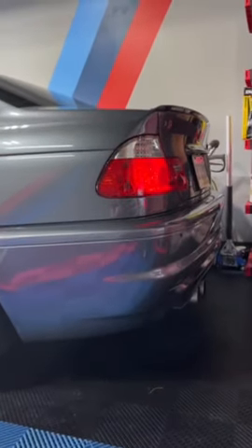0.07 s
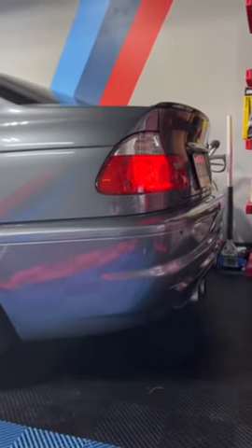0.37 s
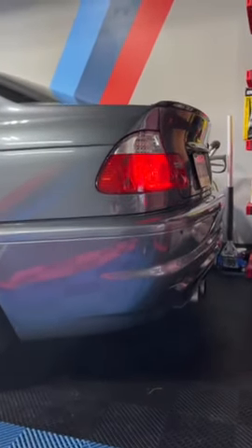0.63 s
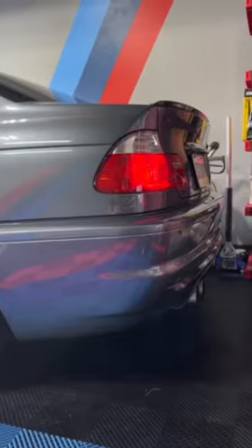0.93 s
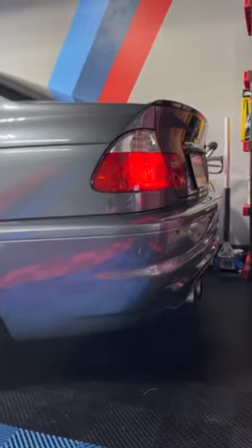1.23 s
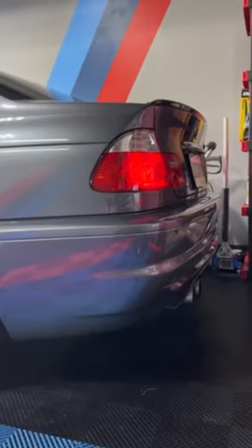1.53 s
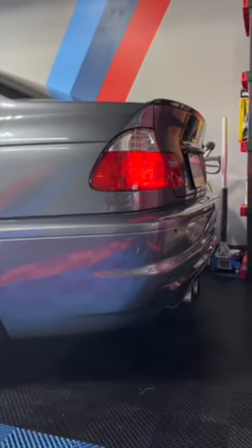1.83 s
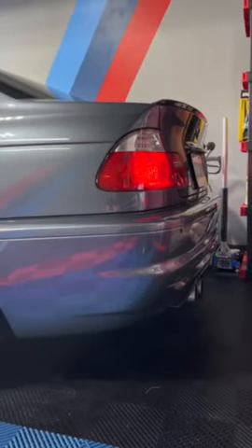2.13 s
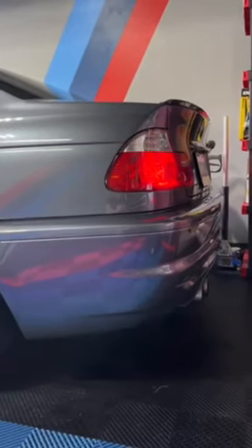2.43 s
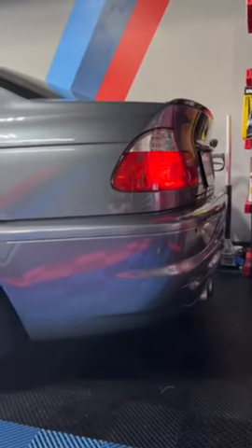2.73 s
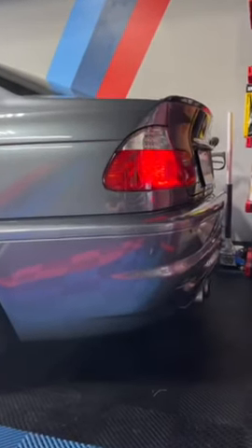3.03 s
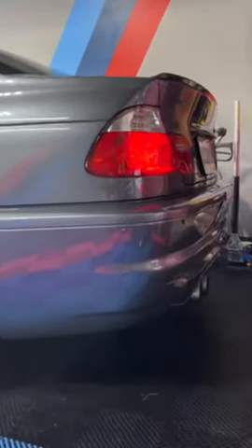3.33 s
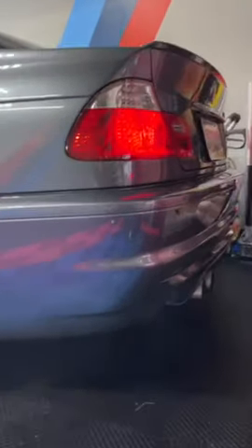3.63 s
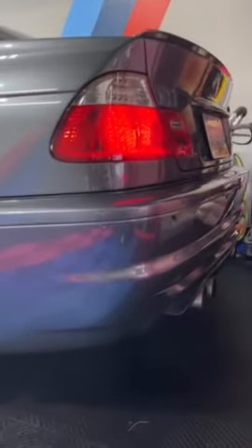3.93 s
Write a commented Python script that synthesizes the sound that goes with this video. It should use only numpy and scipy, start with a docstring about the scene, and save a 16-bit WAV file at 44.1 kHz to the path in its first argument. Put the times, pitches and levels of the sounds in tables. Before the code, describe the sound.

A parked car idles in an enclosed garage, heard close to the tailpipes. The engine speed sinks and the exhaust deepens into a booming, slightly uneven drone with soft burbles and faint hiss, rasping more as the microphone moves closer.

```python
"""The throb of a six-cylinder car at fast idle, in a closed garage, two microphones beside the tailpipes.
The engine settles to idle; as the firing rate sinks under 65 Hz it meets a resonance of exhaust and
room and swells into a deep boom. The two cylinder banks throb at half that rate, gas puffs out at each
firing, uneven firings burble, and behind it all the engine whirs and hisses.
Near the end the microphones move closer to the pipes and the rasp grows."""
import sys
import numpy as np
from scipy import signal
from scipy.fft import rfft, irfft
from scipy.io import wavfile
from scipy.ndimage import uniform_filter1d, minimum_filter1d

SR = 44100
rng = np.random.default_rng(int(sys.argv[2]) if len(sys.argv) > 2 else 0)


def output_pcm(signal):
    """Save a mono or channel-first signal as 16-bit PCM at the path in sys.argv[1].

    Samples are clipped to [-1, 1] before scaling.
    """
    pcm = np.clip(np.atleast_2d(signal).T, -1, 1) * 32767
    wavfile.write(sys.argv[1], SR, np.round(pcm).astype(np.int16))


N = 176400
T = np.arange(N) / SR
HZ = np.fft.rfftfreq(N, 1 / SR)


def amp(db):
    """Decibels to gain."""
    return 10 ** (np.asarray(db) / 20)


def unit(x):
    """Scales to rms 1."""
    return x / np.sqrt(np.mean(abs(x) ** 2) + 1e-20)


def curve(table, column=1):
    """One column of a time table, at every sample."""
    columns = np.transpose(table)
    return np.interp(T, columns[0], columns[column])


def colour(points, hz=HZ):
    """Gain of a spectrum at the given frequencies."""
    f, db = np.transpose(points)
    return amp(np.interp(np.log(hz + 1), np.log(f + 1), db))


def resonances(modes):
    """Gain of a set of narrow resonances at every frequency."""
    return np.sqrt(sum(amp(db) ** 2 / (1 + ((HZ - hz) / width) ** 2) ** 2 for hz, width, db in modes))


def wander(rate_hz=3, size=800):
    """Slow complex random flutter, rms about 1."""
    f = np.fft.fftfreq(size, N / SR / size)
    spectrum = rng.standard_normal(size) + 1j * rng.standard_normal(size)
    drift = np.fft.ifft(spectrum / (1 + (f / rate_hz) ** 2))
    return np.interp(T, np.linspace(0, T[-1], size), unit(drift))


# The microphone pair: f/Hz, left-right likeness, lead of the left/rad
MIC_PAIR = [(0, 1, 0), (200, .99, 0), (420, .95, -.1), (720, .76, -.25), (1300, .72, -.1), (1900, .93, 0),
            (2250, .85, .2), (2900, .35, 1.4), (3800, .56, .9), (4400, .5, 1.8), (4900, .66, 3.3),
            (5400, .68, 5.3), (6000, .9, 6.3), (7300, .73, 7.8), (9000, .97, 9.4), (10200, .87, 10.3),
            (11600, .88, 11.7), (12200, .98, 12.55)]

def noise(gain):
    """Coloured noise of rms 1 as the two microphones hear it in the garage."""
    direct, diffuse = rfft(rng.standard_normal((2, N)))
    f, alike, lead = np.transpose(MIC_PAIR)
    alike, lead = np.interp(HZ, f, alike), np.interp(HZ, f, lead)
    right = alike * direct * np.exp(-1j * lead) + np.sqrt(1 - alike ** 2) * diffuse
    return unit(irfft(np.array([direct, right]) * gain, N))


# Bass modes of the garage: f/Hz, width/Hz, relative level/dB
ROOM_MODES = [(53, 8.8, -2), (98.8, 3, -0.5), (133, 9.3, -4)]
# Their rumble: t/s, level/dB
ROOM_LEVEL = [(0, -30), (.2, -23.5), (.4, -32), (1, -25), (1.5, -53), (2, -26), (2.8, -56), (4, -56)]

def garage():
    """All around the microphones, the gas flow stirs the narrow bass resonances of the room."""
    return noise(resonances(ROOM_MODES)) * amp(curve(ROOM_LEVEL))


# Spectra of belts and valve gear, and of air: f/Hz, relative level/dB
WHIR_SPECTRUM = [(300, -84), (800, 7), (1080, 6.5), (1350, 4), (1650, 1.5), (1850, 1), (2070, 0.5),
                 (2300, 0.5), (2650, 1), (3100, -3.5), (3700, -10), (4400, -6), (5200, -52), (12000, -59)]
HISS_SPECTRUM = [(1500, -61), (2700, -8.5), (3600, -1), (4500, -1.5), (5000, -3), (5900, -2), (6600, -0.5),
                 (7500, 0), (8600, -5), (9700, -0.5), (11100, 5), (12000, -6.5), (13000, -12), (13700, -29),
                 (16000, -32)]
# Whines of the belt drive: f/Hz, width/Hz, relative level/dB
BELT_WHINES = [(1658, 30, 1.5), (2044, 42, 0), (3570, 30, -3)]
# The engine as heard from the tailpipes: t/s, whir level/dB, hiss level/dB
ENGINE_LEVELS = [(0, -33.5, -37.5), (.35, -34, -37.5), (.7, -36.5, -38.5), (1.1, -39, -37),
                 (1.45, -40.5, -36.5), (1.8, -39, -34.5), (2.02, -40, -38.5), (2.4, -40.5, -36.5),
                 (2.8, -36.5, -34), (3.2, -37, -32.5), (3.6, -36.5, -33), (4, -35.5, -31.5)]

def engine(firings):
    """Farther off, a whir that pulses lightly with the valves, faint belt whines and a hiss of air."""
    whir = noise(colour(WHIR_SPECTRUM)) * (1 + .11 * np.cos(2 * np.pi * firings))
    whine = noise(resonances(BELT_WHINES)) * amp(-12)
    hiss = noise(colour(HISS_SPECTRUM)) * (1 + .11 * wander(rate_hz=12).real)
    return (whir + whine) * amp(curve(ENGINE_LEVELS, 1)) + hiss * amp(curve(ENGINE_LEVELS, 2))


# Resonances of the tailpipes and of their mouth: f/Hz, width/Hz, relative level/dB
PIPE_MODES = [(244.5, 17, 2), (326, 20, 2.5), (369, 10.7, 5), (431, 19, -0.5), (667, 12, -2.5),
              (728, 16, -2.5), (892, 9.7, -3.5), (1068, 20, -19)]
MOUTH_MODES = [(559.6, 13, 0)]
# The ringing of each at the microphones: t/s, level/dB
PIPE_LEVEL = [(0, -57), (.6, -36.5), (.8, -30.5), (1.1, -34.5), (1.35, -30.5), (1.55, -31), (1.75, -27.5),
              (2, -33), (2.4, -29), (2.8, -34), (3.3, -30), (3.6, -33), (4, -31)]
MOUTH_LEVEL = [(0, -53), (1.2, -43), (1.55, -46), (2, -48), (2.8, -45), (3.55, -33), (4, -29)]

def pipe_ring():
    """Gas rings the tailpipes; the note at their mouth grows as the microphones come close."""
    pipes = noise(resonances(PIPE_MODES)) * amp(curve(PIPE_LEVEL))
    mouth = noise(resonances(MOUTH_MODES)) * amp(curve(MOUTH_LEVEL))
    return pipes + mouth


# Burbles in the pipes: crest t/s, f/Hz, level/dB, swell time/s
BURBLES = [(.6, 311, -31, .06), (.775, 250, -25, .05), (.79, 360, -22, .08), (1.095, 250, -19.5, .045),
           (1.095, 320, -26, .04), (1.17, 308, -26, .035), (1.59, 660, -34, .04), (1.86, 250, -26, .04),
           (1.98, 670, -32, .06), (2.17, 246, -22.5, .04), (2.24, 250, -25, .03), (3.52, 256, -22.5, .05),
           (3.555, 590, -21, .018), (3.59, 385, -25, .025), (3.869, 590, -18.5, .008)]

def burbles():
    """An uneven firing thumps one pipe resonance, which swells and dies away."""
    out = np.zeros(N)
    for (crest, hz, db, swell), phase in zip(BURBLES, rng.random(len(BURBLES))):
        age = np.maximum(1 + (T - crest) / swell, 0)
        envelope = (age * np.exp(1 - age)) ** 4
        out += amp(db) * envelope * np.cos(2 * np.pi * (hz * T + phase))
    return np.sqrt(2) * out


# Spectrum of the rushing gas: f/Hz, relative level/dB
GAS_SPECTRUM = [(50, -30), (130, -6), (190, -2), (250, 1), (360, 0), (440, -.5), (620, -8), (800, -13),
                (1050, -13.5), (1500, -22.5), (3000, -33), (8000, -63)]
# The gas beside the pipes: t/s, level/dB
GAS_LEVEL = [(0, -38), (.6, -37.5), (.8, -34), (1.1, -32.5), (1.4, -35), (1.75, -34), (2.15, -32),
             (2.7, -34), (3.1, -32), (3.35, -30), (3.57, -28), (4, -30)]
# The six cylinders in firing order: relative level/dB
CYLINDERS = [1.5, -0.77, 1.8, -2.2, 1.3, -1.2]
FIRING_NUMBERS = np.arange(400)

def gas_puffs(pulses):
    """Gas leaves the pipes in a puff at each firing, each cylinder with its own strength."""
    cylinder = amp(np.interp(pulses, FIRING_NUMBERS, np.resize(CYLINDERS, len(FIRING_NUMBERS))))
    puffing = unit(cylinder * (1 + .7 * np.cos(2 * np.pi * pulses)))
    return noise(colour(GAS_SPECTRUM)) * puffing * amp(curve(GAS_LEVEL))


def bank_pulses(rate, pulses, response, rough, spread, smear_s_per_hz):
    """Pulses of the cylinder banks as fluttering harmonics, smeared in time by pipe and room."""
    mid, side = np.zeros((2, N))
    bank_phasor = np.exp(1j * np.pi * pulses)
    low, high = response[0][0], response[-1][0]
    rough = rough * (rate.min() / rate) ** .6  # a faster engine flutters less
    for k in np.setdiff1d(np.arange(1, 42), [2, 4, 6]):  # boom() plays these three
        hz = k * rate / 2
        if hz.max() > low and hz.min() < high:
            smear = np.exp(-1j * np.pi * smear_s_per_hz * (hz.mean() - low) ** 2)
            harmonic = colour(response, hz) * bank_phasor ** k * smear
            mid += (harmonic * (1 + rough * wander())).real
            side += (harmonic * wander()).real * spread * min(k / 10, 1) ** 2
    return np.array([mid + side, mid - side]) * np.sqrt(2 / (1 + rough ** 2))


# Response of pipe and garage to the banks, in a low, a middle and a high band: f/Hz, level/dB
THROB_BAND = [(26, -50), (34, -31), (44, -37), (84, -28.5), (94, -24.5), (125, -30.5), (141, -21),
              (156, -24.5), (176, -25.5), (198, -36), (216, -26.5), (234, -31), (254, -30), (275, -38),
              (310, -101)]
HOLLOW_BAND = [(255, -54), (284, -35), (296, -36), (312, -27.5), (330, -34.5), (345, -37), (366, -31),
               (390, -33.5), (410, -45.5), (430, -54.5), (465, -40.5), (520, -47), (600, -54)]
RASP_BAND = [(400, -52), (470, -42), (530, -50), (580, -37), (620, -44), (650, -41), (700, -48), (735, -47),
             (810, -58), (885, -50), (1000, -55), (1400, -90)]
# Gain on each band: t/s, throb level/dB, hollow level/dB, rasp level/dB
BAND_LEVELS = [(0, -3, -5, 2), (.4, 0, -0.5, -8.5), (.6, 1, -5, -8), (.8, -3, 0, -10), (1.1, -5.5, -4, -13),
               (1.35, -4, -7.5, -9.5), (1.55, -1.5, -6, 0.5), (1.75, -5.5, -5.5, -17),
               (1.95, -5.5, -5.5, -2), (2.15, -8, -8, -11.5), (2.45, -2, -6, -3), (2.62, -2.5, 1.5, -4.5),
               (3.15, -3.5, 1.5, -1), (3.35, -3.5, -4, 1), (3.57, -1, -0.5, 0), (3.78, -1, 3, -1),
               (4, -2, 1.5, 1)]

def exhaust(rate, firings):
    """Close by, the pipes throb, sound hollow, rasp and puff; no two firings are quite alike."""
    pulses = firings - 1.22  # the pulses trail the boom
    uneven = np.interp(pulses, FIRING_NUMBERS, 1 + .09 * rng.standard_normal(len(FIRING_NUMBERS)))
    puffs = gas_puffs(pulses)
    ring = pipe_ring()
    throb = bank_pulses(rate, pulses, THROB_BAND, rough=.18, spread=.0075, smear_s_per_hz=7e-5)
    hollow = bank_pulses(rate, pulses, HOLLOW_BAND, rough=.27, spread=.15, smear_s_per_hz=7e-5)
    rasp = bank_pulses(rate, pulses, RASP_BAND, rough=.6, spread=.37, smear_s_per_hz=5e-5)
    throb *= amp(curve(BAND_LEVELS, 1))
    hollow *= amp(curve(BAND_LEVELS, 2))
    rasp *= amp(curve(BAND_LEVELS, 3))
    return throb + uneven * (hollow + rasp + puffs) + ring


# Tones at one, two and three times the firing rate: t/s, level/dB
BOOM_LEVEL = [(0, -16), (.3, -15.5), (.5, -20), (.8, -23.5), (.95, -21), (1.1, -10.5), (1.3, -7.5),
              (1.55, -6), (1.68, -7), (1.8, -11), (2.02, -10.5), (2.2, -8.5), (2.65, -4.5), (3.25, -5),
              (3.52, -4), (3.75, -3.5), (4, -3)]
DRONE_LEVEL = [(0, -26), (.2, -29), (.38, -25.5), (.52, -31), (.65, -28), (.73, -20), (.8, -16),
               (.88, -15.3), (.97, -18.5), (1.1, -28), (1.5, -35), (1.85, -25.5), (2.2, -29), (2.6, -37),
               (3.2, -38), (3.5, -31), (3.8, -37), (4, -34)]
OVERTONE_LEVEL = [(0, -28), (.4, -26.5), (.5, -36.5), (1.1, -35.5), (1.3, -29), (1.8, -31.5), (2, -29.5),
                  (2.45, -32), (2.75, -36.5), (3.5, -30), (4, -29)]

def boom(firings):
    """The firing tone and two wavering overtones fill the garage, swelling where they meet resonances."""
    angle = 2 * np.pi * firings
    fundamental = amp(curve(BOOM_LEVEL)) * np.cos(angle)
    drone = amp(curve(DRONE_LEVEL)) * (np.exp(2j * angle) * (1 + .07 * wander())).imag
    overtone = amp(curve(OVERTONE_LEVEL)) * (np.exp(3j * angle) * (1 + .2 * wander())).imag
    return np.sqrt(2) * (fundamental + drone + overtone)


# Engine speed, from fast idle to idle: t/s, firing rate f/Hz
FIRING_RATE = [(0, 87), (.25, 84.7), (.55, 78.7), (.8, 72.1), (1.05, 64.2), (1.25, 59.8), (1.48, 56.95),
               (1.68, 58), (1.88, 63.8), (2.05, 63.5), (2.35, 58.95), (2.7, 56.15), (2.95, 56.6),
               (3.25, 56.7), (3.53, 59.25), (3.78, 56.8), (4, 57.1)]

def scene():
    """The car from beside its tailpipes; one count of firings times the boom, exhaust and valves."""
    rate = curve(FIRING_RATE)
    firings = np.cumsum(rate) / SR
    return boom(firings) + exhaust(rate, firings) + burbles() + garage() + engine(firings)


def record(dry):
    """Behind the microphones, a limiter catches the highest crests and a low-pass trims the treble."""
    ceiling, window, edge_hz = .95, round(.02 * SR), 14500
    gain = ceiling / np.maximum(abs(dry).max(0), ceiling)
    limited = dry * uniform_filter1d(minimum_filter1d(gain, window), window)
    lowpass = signal.firwin(511, edge_hz, window=("kaiser", 9), fs=SR)
    return signal.oaconvolve(limited, lowpass[None], "same")


dry = scene()
out = record(dry)
output_pcm(out)
```